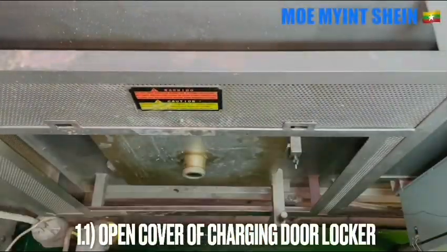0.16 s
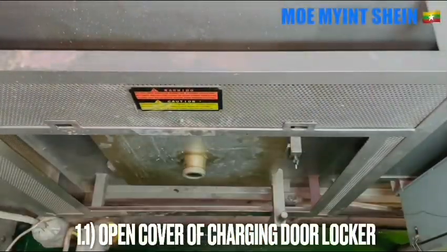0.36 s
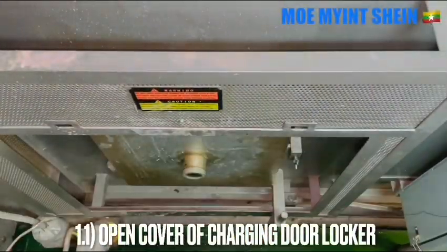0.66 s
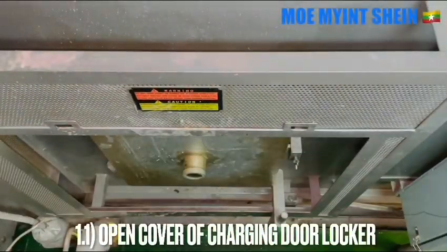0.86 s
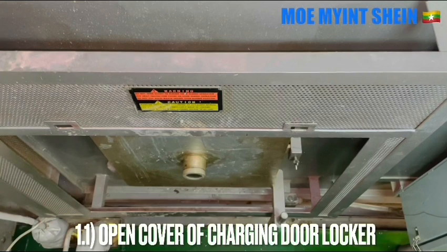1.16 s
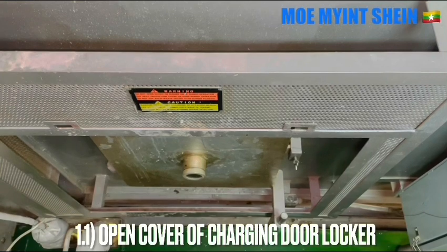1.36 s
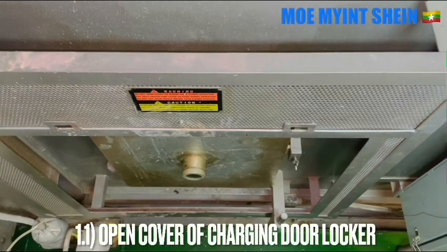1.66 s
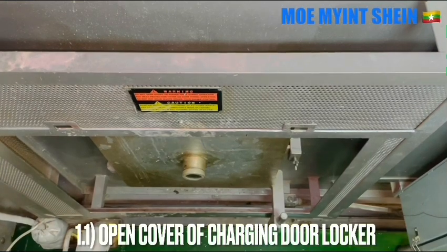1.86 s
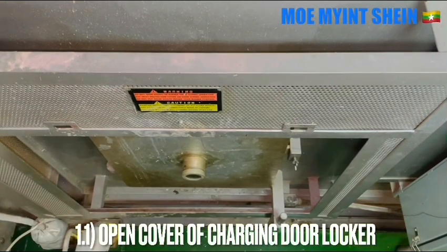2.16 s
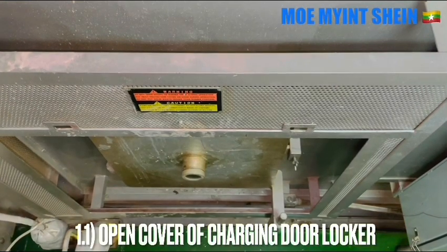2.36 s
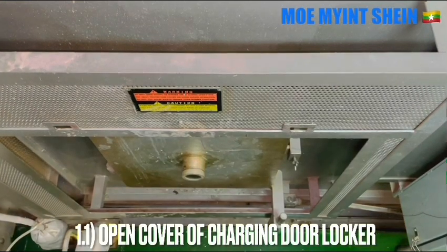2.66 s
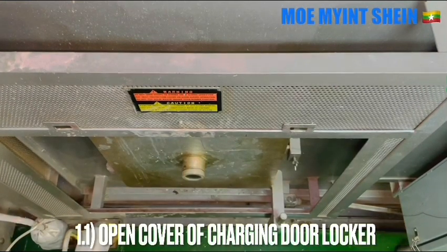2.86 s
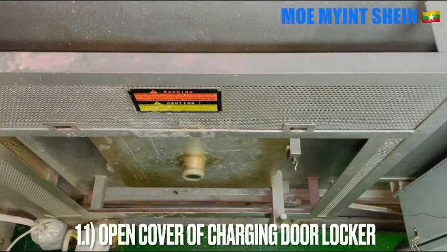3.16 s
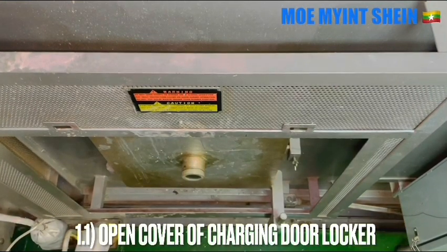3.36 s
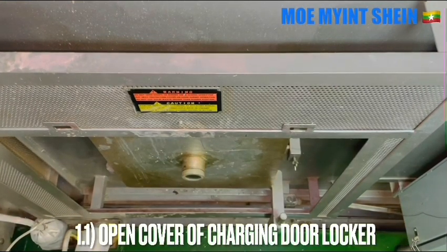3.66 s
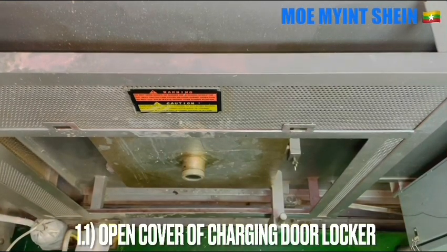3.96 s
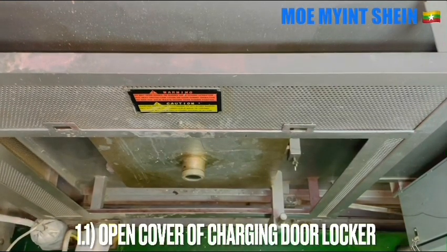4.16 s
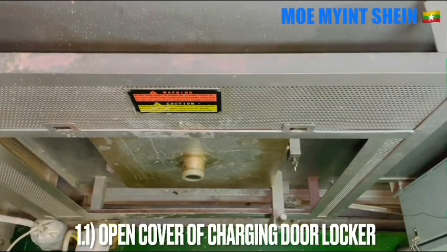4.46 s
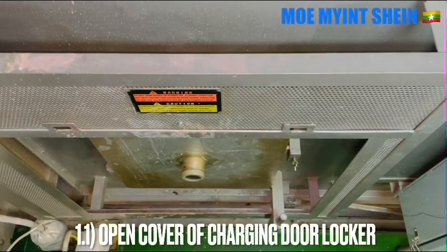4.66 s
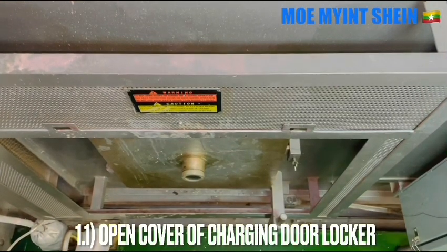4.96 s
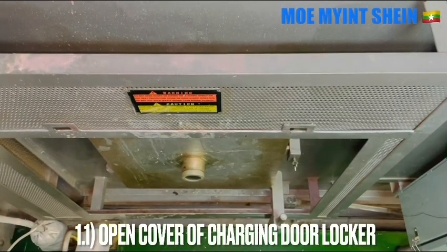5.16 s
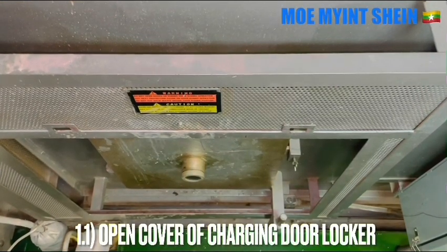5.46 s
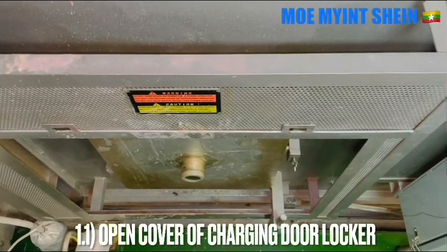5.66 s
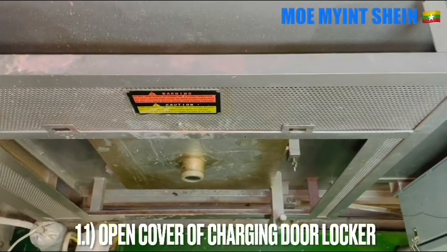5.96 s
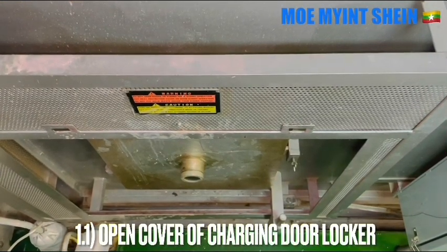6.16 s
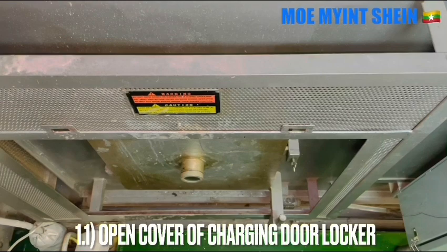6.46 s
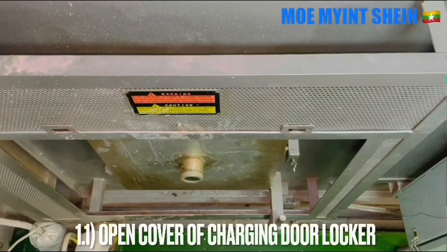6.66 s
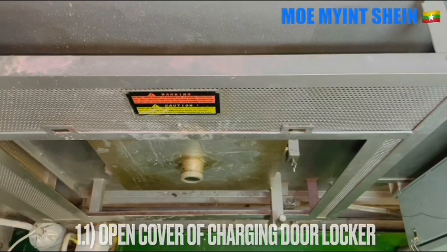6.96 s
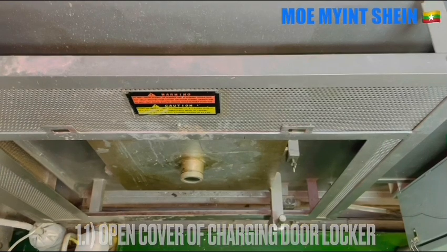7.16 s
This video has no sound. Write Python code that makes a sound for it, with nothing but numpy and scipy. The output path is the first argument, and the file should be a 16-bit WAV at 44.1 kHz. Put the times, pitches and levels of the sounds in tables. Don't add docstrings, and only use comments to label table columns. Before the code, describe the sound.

Continuous low machinery rumble fills a hard metal room, gently swelling and easing, with soft duct hiss above. Close to the microphone, a dry click and a gritty double-catch scuff occur in the first half second. Later only faint fabric brushes, minute ticks and two quiet sole squeaks, the second clearer at the very end.

```python
import sys
import numpy as np
from scipy import signal
from scipy.fft import rfft, irfft, next_fast_len
from scipy.io import wavfile
from scipy.ndimage import map_coordinates

SR = 44100
rng = np.random.default_rng(int(sys.argv[2]) if len(sys.argv) > 2 else 0)


def unload_audio(sound):
    columns = np.transpose(np.atleast_2d(sound))
    steps = np.round(np.clip(columns, -1, 1) * 32767)
    wavfile.write(sys.argv[1], SR, steps.astype(np.int16))


def decibels_to_gain(level_db):
    exponent = np.asarray(level_db, float) / 20
    return 10 ** exponent


N = 322736

# multiple of the generator's cycle rate (one cycle per two shaft turns), level in
# dB rms.
GENERATOR_ORDERS = [(4, -58.6), (5, -50.2), (6, -42.0), (7, -51.3), (9, -53.1), (10, -43.6), (11, -49.2),
                    (12, -46.8), (13, -53.4), (14, -40.0), (15, -52.0), (17, -59.1), (18, -53.9),
                    (21, -63.1), (25, -61.0), (31, -66.1), (32, -69.0), (41, -71.9), (45, -69.8),
                    (48, -68.3), (50, -73.0), (51, -73.1), (54, -72.4), (62, -81.8), (63, -80.1),
                    (64, -70.8)]
# multiple of shaft speed, level in dB rms.
ENGINE_ORDERS = [(4, -71), (5, -58.7), (6, -54.7), (7, -54.4), (8, -53.6), (9, -47.5), (10, -53)]
# multiple of shaft speed, level in dB rms.
PUMP_ORDERS = [(3, -46.5), (5, -45.9), (6, -51.9), (7, -58.7), (23, -76.8)]
# multiple of the generator's cycle rate, level in dB rms.
VALVE_ORDERS = [(91, -79), (94, -79), (99, -78), (108, -75), (145, -77)]
# frequency in Hz, level in dB rms.
WHINES = [(26.09, -55.4), (70.06, -50.6), (79.65, -49.9), (92.47, -48.9), (175.38, -56.7), (352.44, -68.1),
          (418.08, -67.8), (455.71, -76.8), (806.68, -77.6), (809.24, -75.1), (823.97, -80.9),
          (852.05, -75.1), (985.86, -68.6), (1007.19, -81.4), (1057.49, -72.9), (1091.41, -78.7),
          (1232.69, -77.2), (1530.22, -80.4), (1546.3, -83.1), (1766.26, -82.5), (2548.46, -95.9),
          (2904.01, -94.4)]
# frequency in Hz, level of an order in dB rms.
CLATTER_SPECTRUM = [(480, -85.5), (800, -89.5), (1200, -85.5), (1800, -92.5), (2100, -101), (2900, -100),
                    (3200, -110)]
# frequency in Hz, density in dB per Hz.
HULL_SPECTRUM = [(16, -25), (22, -23), (30, -7), (45, 0), (62, -3), (85, -3), (105, -6.5), (122, -10),
                 (140, -12.5), (160, -15.5), (175, -10.5), (190, -15), (200, -14)]
# frequency in Hz, density in dB per Hz.
ROAR_SPECTRUM = [(212, -0.5), (280, -0.5), (340, -1), (400, -4), (450, -9), (560, -13), (680, -16),
                 (800, -14), (1000, -18.5), (1400, -18), (1750, -19), (2000, -24.5)]
# frequency in Hz, density in dB per Hz.
HISS_SPECTRUM = [(1180, -32), (2000, -1.5), (2350, -2.5), (2750, 0), (3210, -5), (3500, -5), (3680, -8),
                 (4760, -11), (5370, -10.5), (5900, -12), (7640, -14.5), (8840, -15.5), (10600, -21),
                 (12900, -17.5), (15600, -28.5)]
# centre in Hz, width in Hz, lift in dB.
PLATE_MODES = [(43.7, 11, 1), (138, 8, 3.5), (175.5, 8.6, 3), (197.6, 6.3, 3), (232, 11, 3.5),
               (264.4, 5.8, 4), (295.8, 14.5, 4.5), (332, 17, 4), (358, 7.9, 1.5), (394.5, 9.7, 4.5),
               (415, 7.1, 3.5)]
# centre in Hz, width in Hz, lift in dB.
CASING_MODES = [(1230, 15, 4), (1766, 12, 6), (2240, 10, 3), (2410, 12, 4), (2545, 22, 5), (2904, 12, 8),
                (3515, 50, 4), (5470, 16, 6), (5655, 20, 4)]
# frequency in Hz, density in dB per Hz.
RUSTLE_SPECTRUM = [(3500, -16), (6000, -3), (9000, -3), (10500, -10), (12500, 1), (15000, -3), (15900, -1)]
# middle in seconds, level in dB, half length in seconds.
CLOTH_BRUSHES = [(.58, -86, .04), (.97, -78, .13), (1.3, -81, .09), (1.81, -83, .06), (2.4, -79, .09),
                 (2.785, -76, .025), (3.55, -80, .05), (3.76, -79, .06), (4.32, -81.5, .08),
                 (4.49, -79, .03), (5.925, -76.5, .025), (6.55, -80, .03)]
# start in seconds, level in dB, low edge in Hz, high edge in Hz, t60 in seconds.
TICKS = [
    (.0902, -45.5, 3300, 15000, 0.0047),
    (.362, -62, 2800, 6500, .04),
    (.394, -59.5, 2800, 6000, 0.057),
    (.396, -67, 6500, 9000, .03),
    (2.786, -67, 10000, 15600, .015),
    (5.92, -65, 5000, 7700, .05),
    (6.54, -68, 5000, 7700, .04),
]
# time in seconds, level in dB.
SCUFF_CATCHES = [
    (.364, -57.5),
    (.4, -55.5),
]
# centre in Hz, width in Hz.
SCUFF_MODES = [
    (1520, 680),
    (2470, 520),
]
# level in dB, t60 in seconds.
SCUFF_DECAYS = [
    (1, .7),
    (-1.5, .25),
]
# time of fastest slip in seconds, its rate in Hz, glide in Hz per second,
# rounding of the turn in seconds, level in dB.
SQUEAKS = [
    (5.046, 1102, 2200, .016, -80),
    (7.325, 977, 13000, 0.16, -65),
]
# multiple of slip rate, final level in dB,
# growth from first slip to last in dB.
SQUEAK_OVERTONES = [
    [(8, 8, 6), (9, -10, -24), (10, 6, 0), (11, 0, 0)],
    [(6, -11, -6), (8, -14, 0), (10, -15, -14), (11, -14, 0), (12, 7, 50), (13, 3, -6), (14, -14, 0)],
]
# frequency in
# Hz, gain in dB.
SQUEAK_RESPONSE = [(4000, -10), (5700, 0), (6800, -5), (7700, 0), (8700, 0), (9200, -12), (9600, -6),
                   (10300, -15), (11000, -2), (12500, 0), (14500, -10)]

GENERATOR_HZ, ENGINE_HZ, PUMP_HZ = 7.516, 4.115, 19.82
FIRING_ORDER, FIRING_LIFT_DB = 6, 1.5
DEEP_DB, HULL_DB, ROAR_DB, HISS_DB = -42.5, -39.5, -51, -68.5
ROLL_PERIOD_S, ROLL_PEAK_S, ROLL_DB = 4.65, 1.47, 3
LULL_S, LULL_LENGTH_S, LULL_DB = 3.97, 0.028, 22
CLOTH_REST_DB = -82.5
SCUFF_ATTACK_S = .01
GRIP_SHARE = 0.81
LIFT_S, SLIP_DB_PER_OCTAVE = .095, 38


def unit(x):
    return x / np.sqrt(np.mean(x ** 2) + 1e-20)


def along(points, hz):
    point_hz, point_db = np.transpose(points)
    return np.interp(np.log(hz + 1), np.log(point_hz + 1), point_db, -120, -120)


def wobble(knots_per_s):
    knots = rng.standard_normal(int(N * knots_per_s / SR) + 4)
    return map_coordinates(knots, [np.arange(N) * knots_per_s / SR])


def rush(gain):
    size = next_fast_len(N + 8192)
    spectrum = rfft(rng.standard_normal(size)) * gain(np.fft.rfftfreq(size, 1 / SR))
    return unit(irfft(spectrum, size)[:N])


def resonance(hz, centre_hz, width_hz):
    return 1 / (1 + (2 * (hz - centre_hz) / width_hz) ** 2)


def tones(lines, base_hz, drift, flutter_db):
    turn = 2 * np.pi * base_hz * np.cumsum(1 + drift * wobble(1.49)) / SR
    flutters = [decibels_to_gain(flutter_db * wobble(1.517)) for _ in range(4)]
    phases = rng.uniform(0, 2 * np.pi, len(lines))
    out = np.zeros(N)
    for i, (multiple, db) in enumerate(lines):
        out += decibels_to_gain(db) * flutters[i % 4] * np.sin(multiple * turn + phases[i])
    return np.sqrt(2) * out


def roll_db():
    t = np.arange(N) / SR
    return ROLL_DB * np.cos(2 * np.pi * (t - ROLL_PEAK_S) / ROLL_PERIOD_S)


def clatter():
    size = 4096
    order = np.arange(size // 2 + 1)
    real, imaginary = rng.standard_normal((2, len(order)))
    level = decibels_to_gain(along(CLATTER_SPECTRUM, order * GENERATOR_HZ))
    cycle = irfft(level * (real + 1j * imaginary) * size / 2, size)
    place = np.cumsum(1 + 1e-4 * wobble(1.5)) * GENERATOR_HZ / SR % 1
    return map_coordinates(cycle, [place * size], mode="grid-wrap")


def machines():
    orders = GENERATOR_ORDERS + VALVE_ORDERS
    firing_order = [row for row in orders if row[0] == FIRING_ORDER]
    other_orders = [row for row in orders if row[0] != FIRING_ORDER]
    firing = decibels_to_gain(FIRING_LIFT_DB + roll_db()) * tones(firing_order, GENERATOR_HZ, 1e-4, 1)
    generator = firing + tones(other_orders, GENERATOR_HZ, 1e-4, 1) + clatter()
    engine = tones(ENGINE_ORDERS, ENGINE_HZ, 1e-3, 2)
    pump = tones(PUMP_ORDERS, PUMP_HZ, 3e-4, 1.5)
    whines = tones(WHINES, 1, 1e-4, 1.5)
    return generator + engine + pump + whines


def rumble():
    t = np.arange(N) / SR
    lull_db = -LULL_DB * np.exp(-((t - LULL_S) / LULL_LENGTH_S) ** 2)
    hull_points = HULL_SPECTRUM + [(204, HULL_SPECTRUM[-1][1])]
    roar_points = [(204, ROAR_SPECTRUM[0][1])] + ROAR_SPECTRUM

    def coloured(points, hz):
        modes = PLATE_MODES + CASING_MODES
        lift_db = sum(db * resonance(hz, centre, width) for centre, width, db in modes)
        return decibels_to_gain(lift_db) * decibels_to_gain(along(points, hz))

    def upper(hz):
        return np.clip((hz - 60) / 10, 0, 1)

    deep = rush(lambda hz: coloured(HULL_SPECTRUM, hz) * np.sqrt(1 - upper(hz)))
    hull = rush(lambda hz: coloured(hull_points, hz) * np.sqrt(upper(hz)))
    roar = rush(lambda hz: coloured(roar_points, hz))

    def hiss_gain(hz):
        modes = PLATE_MODES + CASING_MODES
        lift_db = sum(db * resonance(hz, centre, width) for centre, width, db in modes)
        return decibels_to_gain(lift_db) * decibels_to_gain(along(HISS_SPECTRUM, np.minimum(hz, 15500)))

    hiss = decibels_to_gain(HISS_DB + 0.2 * wobble(8.4)) * rush(hiss_gain)
    plating = decibels_to_gain(DEEP_DB + roll_db() + lull_db) * deep + decibels_to_gain(HULL_DB + lull_db) * hull
    return plating + decibels_to_gain(ROAR_DB) * roar + hiss


def cloth():
    t = np.arange(N) / SR
    power = np.full(N, decibels_to_gain(CLOTH_REST_DB) ** 2)
    for middle_s, db, half_s in CLOTH_BRUSHES:
        power += decibels_to_gain(db) ** 2 * np.exp(-((t - middle_s) / half_s) ** 2)
    crackle = decibels_to_gain(2.5 + 1.2 * wobble(120))
    return crackle * np.sqrt(power) * rush(lambda hz: decibels_to_gain(along(RUSTLE_SPECTRUM, hz)))


def ticks():
    out = np.zeros(N + SR)
    t = np.arange(SR // 8) / SR
    for start_s, db, low_hz, high_hz, t60_s in TICKS:
        band = signal.butter(2, [low_hz, high_hz], "bandpass", fs=SR, output="sos")
        burst = unit(signal.sosfilt(band, rng.standard_normal(len(t))))
        attack = 1 - np.exp(-t / (t60_s / 15))
        out[round(start_s * SR):][:len(t)] += decibels_to_gain(db - 60 * t / t60_s) * attack * burst
    return out[:N]


def scuff():
    t = np.arange(N) / SR
    out = np.zeros(N)
    for (ring_db, t60_s), (centre_hz, width_hz) in zip(SCUFF_DECAYS, SCUFF_MODES):
        shape = np.zeros(N)
        for catch_s, catch_db in SCUFF_CATCHES:
            since = t - catch_s
            attack = np.exp(np.minimum(since, 0) / SCUFF_ATTACK_S)
            decay = decibels_to_gain(-60 * np.maximum(since, 0) / t60_s)
            shape = np.maximum(shape, decibels_to_gain(catch_db) * attack * decay)
        out += decibels_to_gain(ring_db) * shape * rush(lambda hz: resonance(hz, centre_hz, width_hz))
    return out


def squeaks():
    out = np.zeros(N)
    t = np.arange(N) / SR
    for (top_s, top_hz, glide, rounding_s, top_db), overtones in zip(SQUEAKS, SQUEAK_OVERTONES):
        from_top_s = np.hypot(t - top_s, rounding_s) - rounding_s
        share = np.clip(1 - glide / top_hz * from_top_s, .1, 1)
        slipping = (share > GRIP_SHARE) & (t < top_s + LIFT_S)
        left = 1 - np.cumsum(slipping) / slipping.sum()
        slip_db = top_db + SLIP_DB_PER_OCTAVE * np.log2(share)
        turn = 2 * np.pi * np.cumsum(top_hz * share) / SR
        for multiple, final_db, growth_db in overtones:
            sole_db = along(SQUEAK_RESPONSE, multiple * top_hz * share)
            level = decibels_to_gain(slip_db + final_db - growth_db * left + sole_db + 2.5 * wobble(70))
            out += slipping * level * np.sin(multiple * turn + multiple ** 2)
    return out


def scene():
    return (machines() + rumble() + cloth() + ticks() + scuff() + squeaks())[None]


def top_cut(x):
    return signal.sosfilt(signal.butter(12, 15740, fs=SR, output="sos"), x)


def record(dry):
    return top_cut(dry)


dry = scene()
out = record(dry)
unload_audio(out)
```